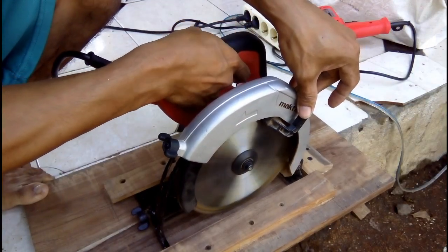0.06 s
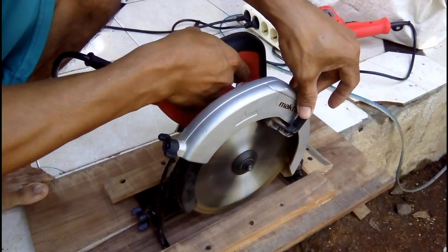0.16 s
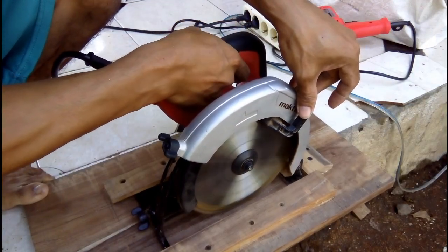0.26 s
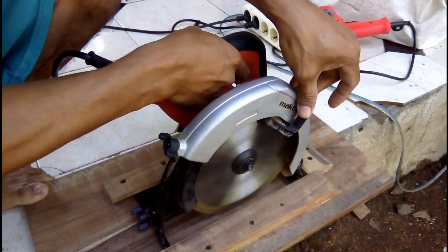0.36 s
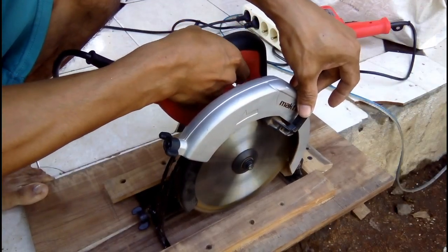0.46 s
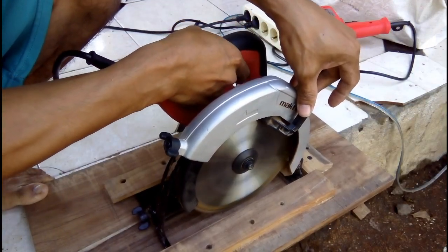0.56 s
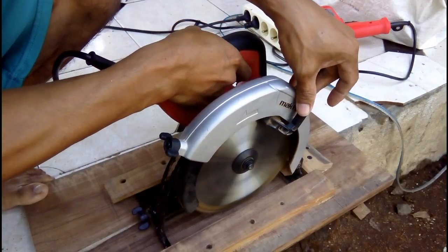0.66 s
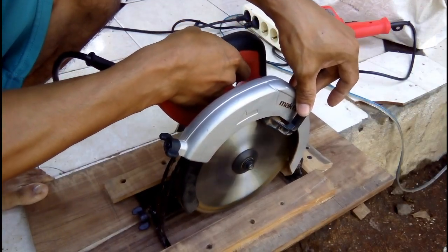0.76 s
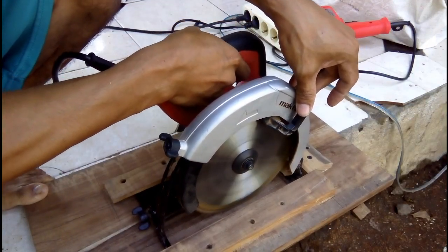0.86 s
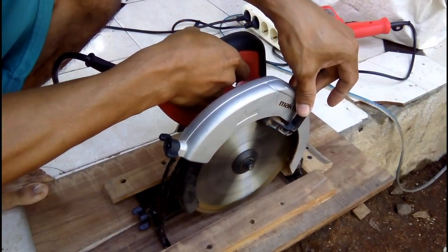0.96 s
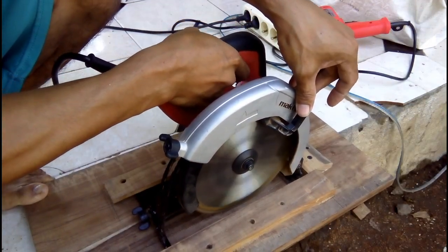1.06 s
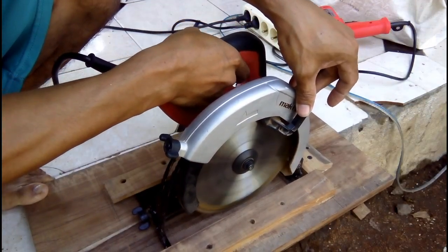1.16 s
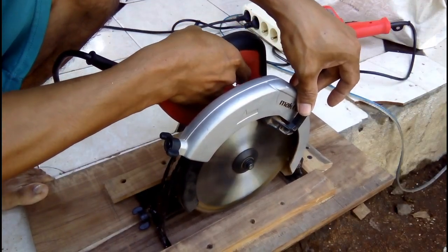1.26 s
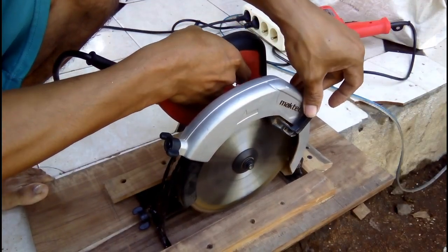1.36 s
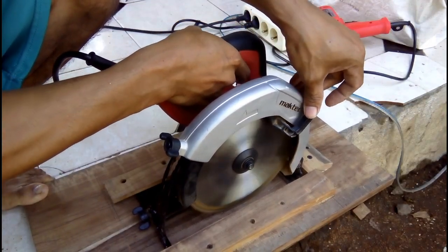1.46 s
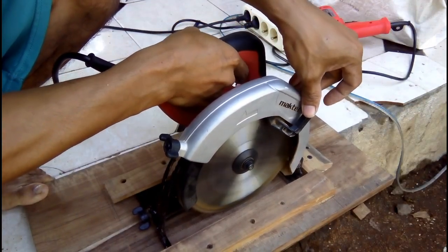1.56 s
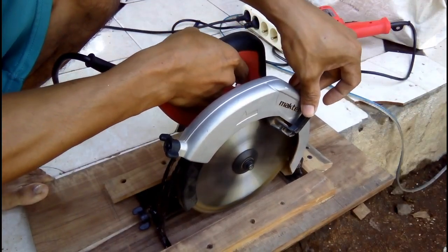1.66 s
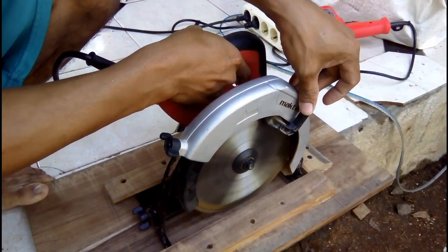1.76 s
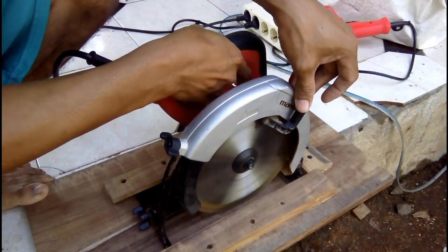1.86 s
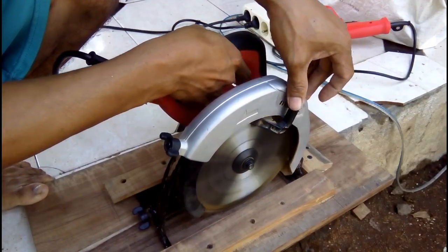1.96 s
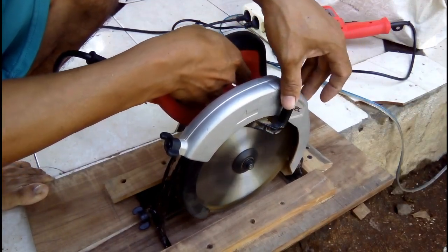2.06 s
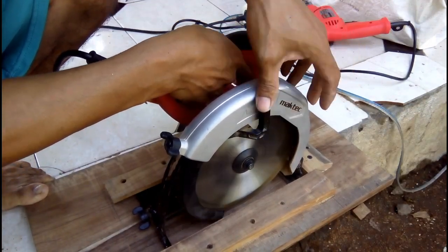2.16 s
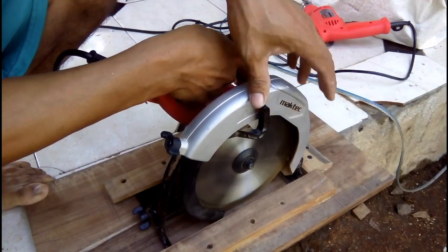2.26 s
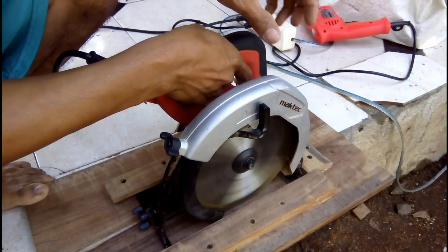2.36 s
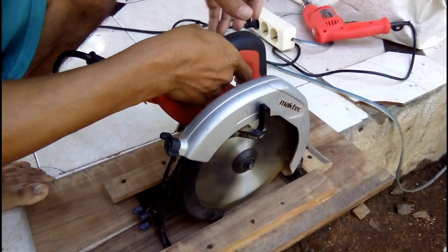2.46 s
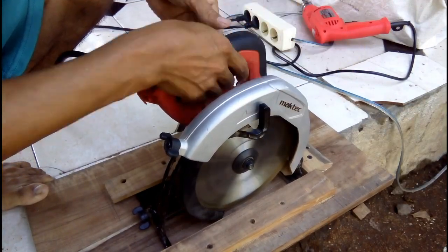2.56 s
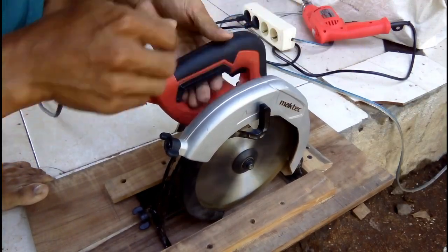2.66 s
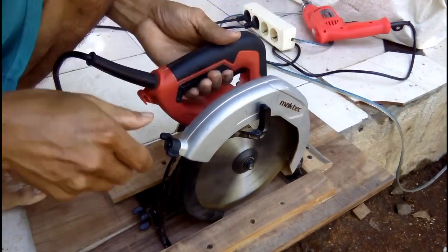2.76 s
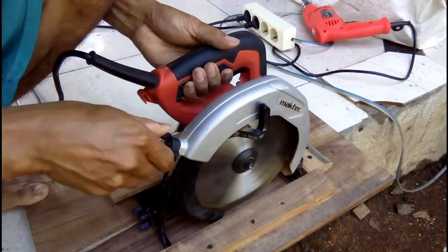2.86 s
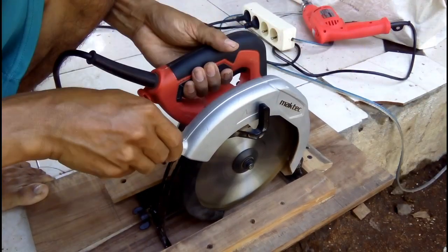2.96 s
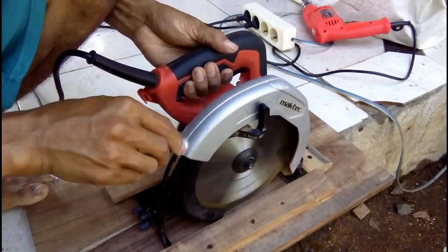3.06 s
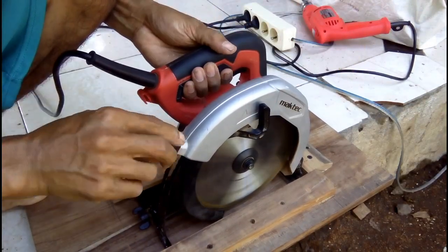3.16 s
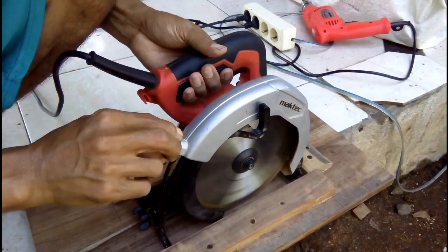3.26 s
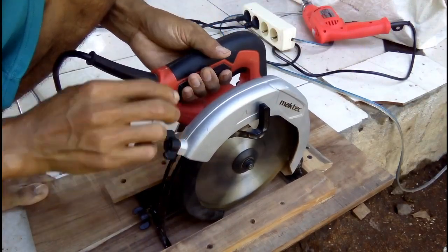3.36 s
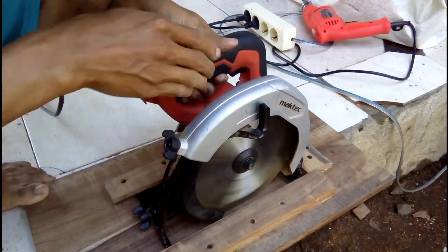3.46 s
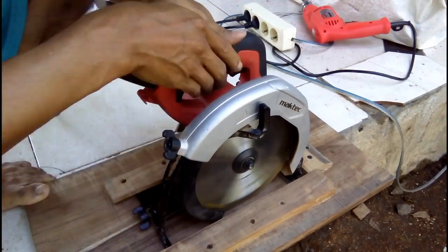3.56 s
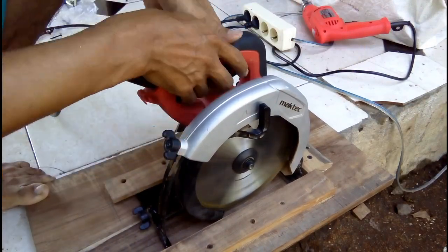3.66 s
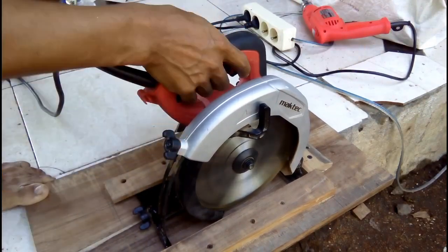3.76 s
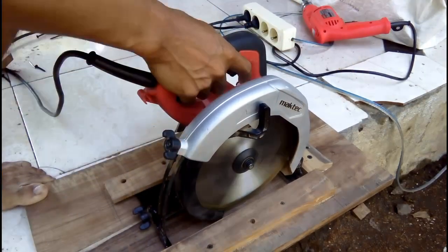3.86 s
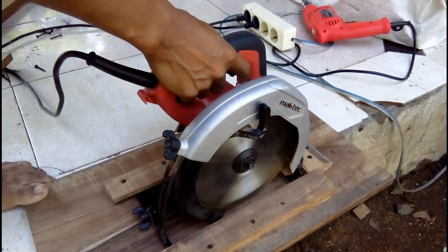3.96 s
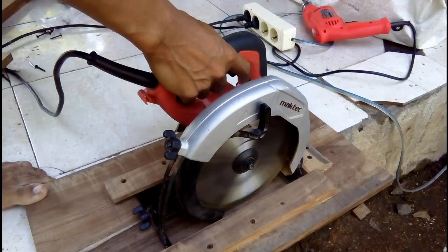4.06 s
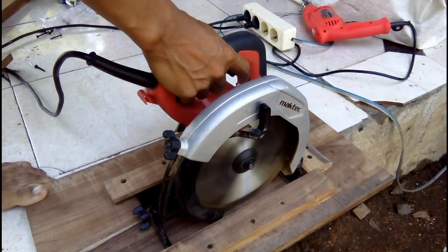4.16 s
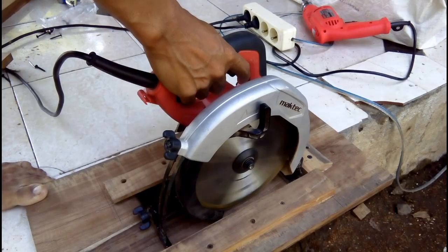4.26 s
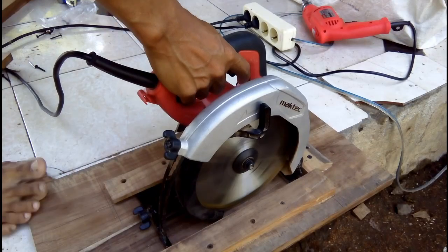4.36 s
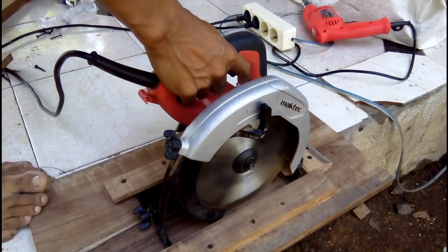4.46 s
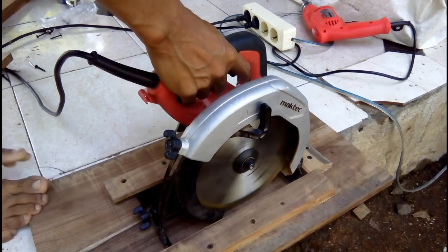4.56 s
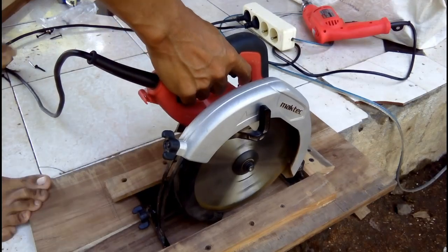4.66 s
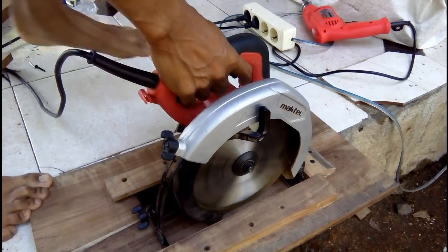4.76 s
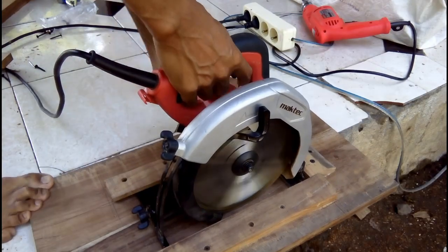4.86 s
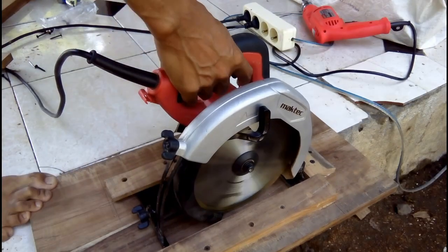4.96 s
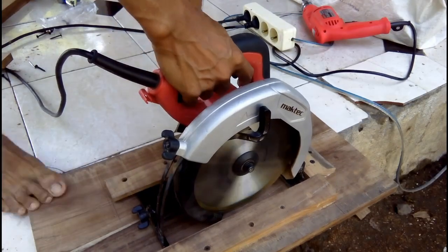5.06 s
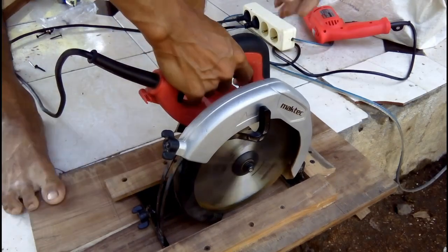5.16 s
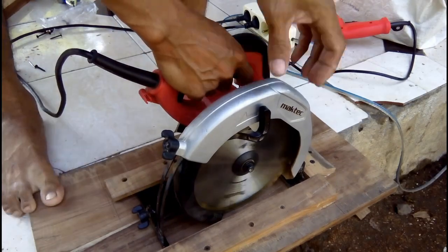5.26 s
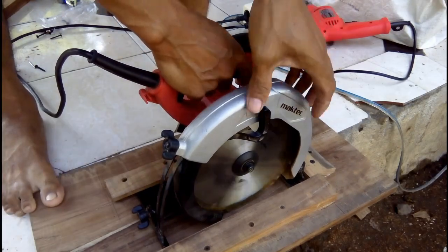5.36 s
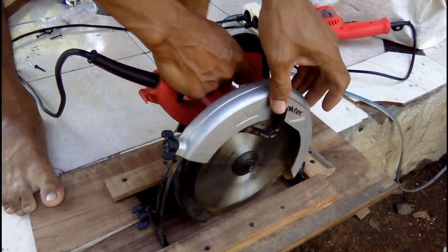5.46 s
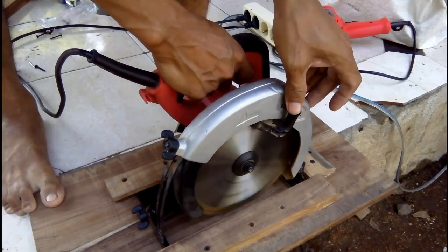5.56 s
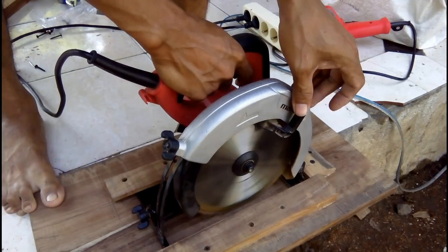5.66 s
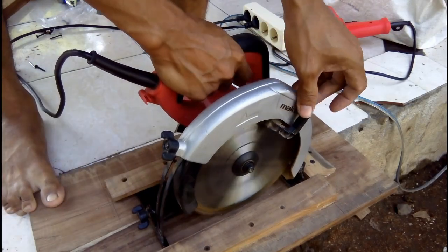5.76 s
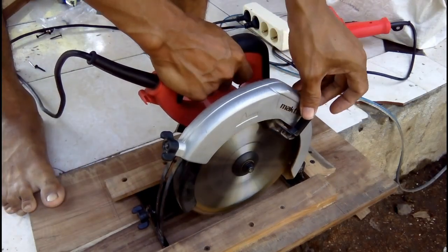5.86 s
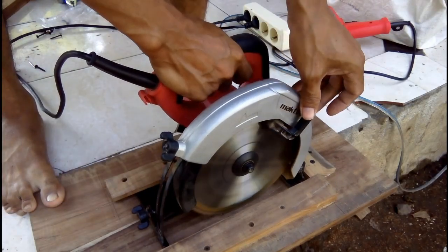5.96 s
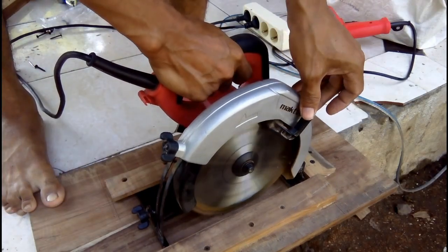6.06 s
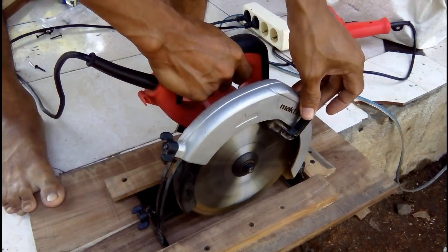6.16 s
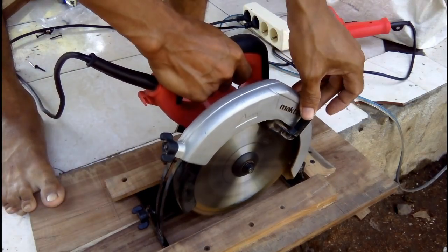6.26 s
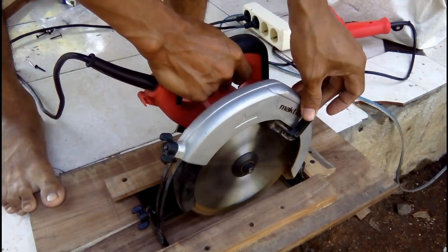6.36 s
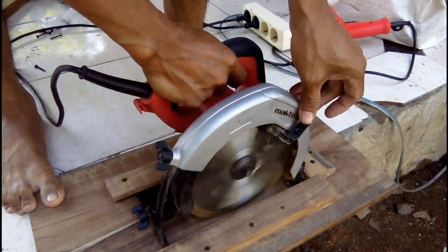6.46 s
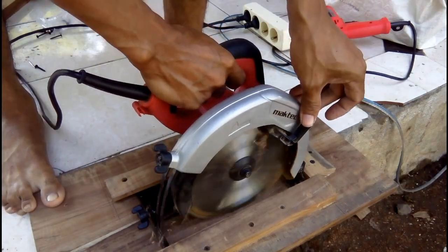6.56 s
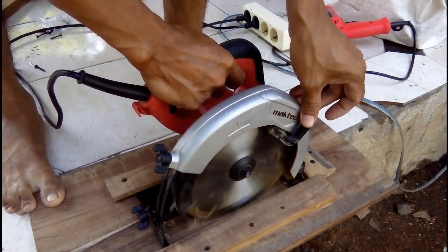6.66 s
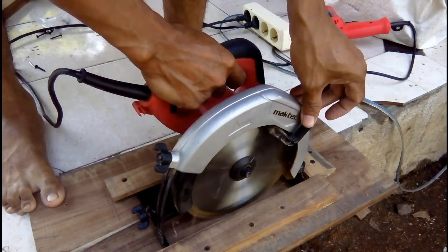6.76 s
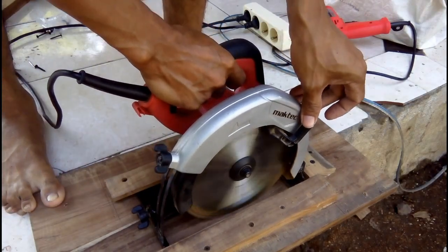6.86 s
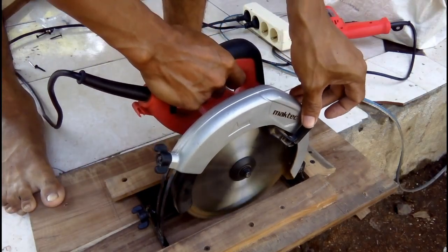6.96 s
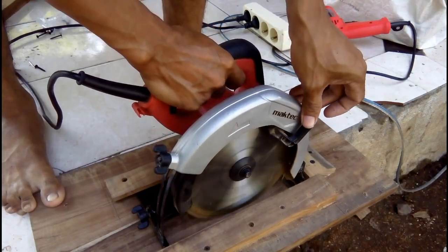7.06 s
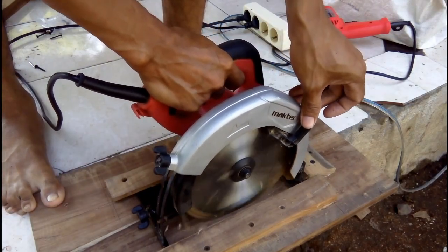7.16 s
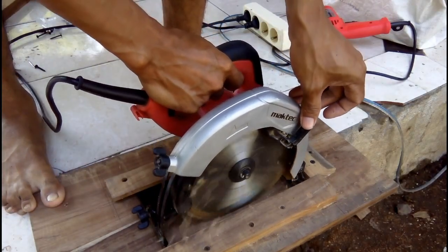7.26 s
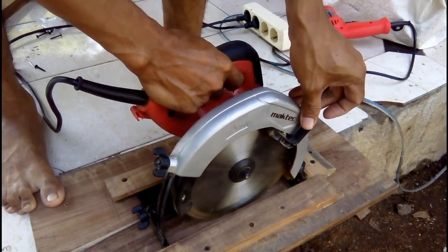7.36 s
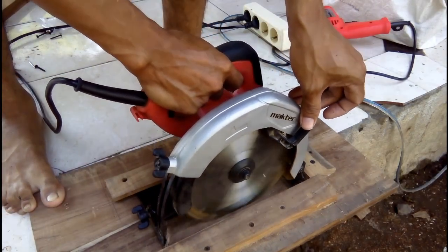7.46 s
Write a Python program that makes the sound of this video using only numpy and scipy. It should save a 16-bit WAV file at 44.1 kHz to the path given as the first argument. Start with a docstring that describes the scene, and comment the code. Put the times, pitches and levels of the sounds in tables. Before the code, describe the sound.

A circular saw on a wooden board, heard very close in stereo, treble leaning left, with a faint steady background. From 0 to 1.5 s it runs free: broad airy blade rush, gritty gear and brush whine, a low once-per-turn hum and faint whistles, with a small dip in speed near 0.9 s and recovery. From about 1.5 s it is off and coasts; the whine glides down and the rush thins, howling briefly around 2.4 s with a light knock. From 3.4 s the board booms and the saw joggles, with dense soft thumps and slaps strongest near 4.3 s, then sparser and weaker, almost still by 5.7 s. At 5.7-5.85 s a cluster of clacks and a sudden growling blip, a slight drop, another clack at 6.05 s, then a rapid run-up. From 6.6 s to the end at 7.5 s it holds a loud, harsh high whine with hard metallic gear chatter and whistles.

```python
"""On a wooden board, close to two microphones, a circular saw runs free and is let go briefly.
It is then switched off and coasts almost to rest, and is at last blipped and run up again.
Fan and blade rush as shaped noise; gear and commutator lines glide through the casing resonances.
Brushes rub, gear teeth strike the gearbox and guard, and blade whistles and guard rings swell as sines.
The slowing saw joggles on the board: impulses ring the wood, with short noisy slaps on top."""
import sys
import numpy as np
from scipy import signal
from scipy.fft import rfft, irfft, next_fast_len
from scipy.io import wavfile
from scipy.ndimage import uniform_filter1d, map_coordinates

SR = 44100
rng = np.random.default_rng(int(sys.argv[2]) if len(sys.argv) > 2 else 0)


def to_wav(sig):
    """Store sig (one row per channel, or 1-D mono) as 16-bit WAV at the path in sys.argv[1].

    Samples outside -1..1 are clipped; the rate is SR.
    """
    pcm = np.clip(np.atleast_2d(sig), -1, 1) * 32767
    pcm = np.round(pcm).astype(np.int16)
    wavfile.write(sys.argv[1], SR, pcm.T)  # frames by channels


N = 331632
# for pure tones: the share that reaches the microphones directly, and the share that is scattered
MOSTLY_DIRECT = np.array([[1], [.3]])


def amp(db):
    """Decibels to gain."""
    return 10 ** (np.asarray(db) / 20)


def unit(x):
    """Scaled to rms 1."""
    return x / np.sqrt(np.mean(x ** 2) + 1e-20)


def seconds():
    """Time of every sample in s."""
    return np.arange(N) / SR


def along(points, hz):
    """(Hz, value) points read on a log axis."""
    f, v = np.transpose(points)
    return np.interp(np.log(hz + 1), np.log(f + 1), v)


def curves(rows):
    """One value per sample for each column after the time."""
    s, *cols = np.transpose(rows)
    return [np.interp(seconds(), s, c) for c in cols]


def wobble(rate):
    """A smooth random curve, rate knots a second."""
    knots = rng.standard_normal(int(N * rate / SR) + 4)
    return map_coordinates(knots, [np.arange(N) * rate / SR], order=2)


def filtered(x, response):
    """x times a complex response of frequency."""
    m = next_fast_len(N + SR // 2)
    return irfft(rfft(x, m) * response(np.fft.rfftfreq(m, 1 / SR)), m)[..., :N]


def lowpass(x, corner_hz, power):
    """x with its treble falling away above a corner, without delay."""
    return filtered(x, lambda hz: 1 / (1 + (hz / corner_hz) ** power))


def ring(x, modes, leak=0):
    """x through resonances, plus a share that passes straight on."""
    def response(f):
        bands = (amp(db) * 1j * f * w / (c * c - f * f + 1j * f * w) for c, w, db in modes)
        return leak + sum(bands)
    return filtered(x, response)


def noise(spectrum):
    """Two unrelated noises, jointly of rms 1: the direct sound and the scattered sound."""
    return unit(filtered(rng.standard_normal((2, N)), lambda hz: amp(along(spectrum, hz))))


def trailing(x, window_s):
    """Running mean over the time just past."""
    size = max(int(window_s * SR), 4)
    return np.abs(uniform_filter1d(x, size, origin=size // 2 - 1))


def impulses(rate):
    """A one at each whole cycle of a rate in Hz, zeros between."""
    return np.diff(np.floor(np.cumsum(rate) / SR), prepend=0)


def shaft_angle(speed):
    """Angle of the armature in radians."""
    return 2 * np.pi * np.cumsum(speed) / SR


def restarted(speed):
    """True from just after the slowest moment on, when the trigger is pulled again."""
    return np.arange(N) > np.argmin(speed)


def torque(speed, smooth_s=0.022):
    """Load on the motor, 0-1: it works hard only while it gathers speed."""
    pickup = trailing(np.maximum(np.diff(speed, prepend=speed[0]), 0), smooth_s)
    return pickup / pickup.max()


# armature speeds in turns/s; below the crawl rubbing dies away
FULL_SPEED, CRAWL_SPEED = 436, 31


def strength(speed, law, load_power=0.86):
    """Gain of one part: windage, rubbing and load add in power."""
    wind_db, wind_power, rub_db, rub_power, load_db = law
    share = speed / FULL_SPEED
    wind = amp(wind_db) * share ** wind_power
    rub = amp(rub_db) * share ** rub_power * np.tanh(speed / CRAWL_SPEED)
    load = amp(load_db) * torque(speed) ** load_power
    return np.sqrt(wind ** 2 + rub ** 2 + load ** 2)


def resonant(speed, swell, still_speed=60):
    """Gain that peaks as the armature passes one speed and dies as it comes to rest."""
    centre, octaves, peak_db, base_db = swell
    peak = amp(peak_db) / (1 + (np.log2(speed / centre) / octaves) ** 2)
    return np.hypot(peak, amp(base_db)) * np.sqrt(np.tanh(speed / still_speed))


# quiet background spectrum: [f/Hz, relative level/dB per Hz]
BACKGROUND = [(60, -5), (300, 0), (1000, -7), (4000, -20), (9000, -44), (15000, -54)]


def background(level_db=-48):
    """Steady faint noise behind the saw."""
    return amp(level_db) * noise(BACKGROUND)


# air spectra from low to high: [f/Hz, relative level/dB per Hz]
ROAR = [(130, -50), (220, -16.5), (290, -7.5), (400, -1.5), (540, -6.5), (740, 1.5), (1000, -7.5),
        (1170, -16), (1300, -7), (1690, -40), (2860, -120)]
RUSH = [(710, -53), (1200, -11.5), (1430, -3), (1690, 0), (1860, -4), (2110, 2.5), (2530, -2.5),
        (3400, -10.5), (4420, -38), (7480, -120)]
JET = [(1880, -18), (3200, 2.5), (3440, -2), (3840, 0.5), (4150, -2), (4670, -1.5), (4900, -3), (6030, -2),
       (6870, -9), (7400, -6.5), (8200, -65), (10700, -50), (18000, -120)]
HISS = [(4470, -26), (7600, 3), (8050, -0.5), (9790, -4), (13600, -8.5), (14600, -6.5), (15200, -34)]
# hollow colour of the vents, strong in the first run: [f/Hz, width/Hz, relative level/dB]
VENTS = [(2100, 360, 3.5), (3177, 32, 0.5), (3285, 31, 1.5), (3577, 48, 7.5), (3740, 160, 7.5),
         (4960, 120, 3)]
# growth with speed and load, for each air band: [windage level/dB at full speed, its power of speed,
# rubbing level/dB at full speed, its power of speed, load level/dB at full torque]
ROAR_LAW = (-25.5, 2.5, -36.5, 0.63, -31.5)
RUSH_LAW = (-17.5, 2, -39, 0.3, -27)
JET_LAW = (-15.5, 3.5, -37.5, 0.9, -29)
HISS_LAW = (-29.5, 4, -50, 0.85, -46.5)


def air(speed, spell_hiss, vents_db=-3.0, restart_rush_db=1):
    """Turbulence round blade and fan; the upper part flutters and pulses with the mains."""
    laws = (ROAR_LAW, RUSH_LAW, JET_LAW, HISS_LAW)
    roar, rush, jet, hiss = (strength(speed, law) for law in laws)
    mains_pulse = 1 + 0.076 * np.sin(2 * np.pi * 100 * seconds())
    flutter = amp(0.72 * wobble(180) + 0.65 * wobble(25)) * mains_pulse
    hollow_db = curves([(1.6, 0), (2.8, -15)])[0] + vents_db
    vent_noise = ring(rng.standard_normal((2, N)), VENTS)
    vents = jet * amp(hollow_db) * unit(filtered(vent_noise, lambda hz: hz < 7400))
    upper = rush * amp(restart_rush_db * restarted(speed)) * noise(RUSH)
    upper = upper + jet * noise(JET) + np.hypot(hiss, spell_hiss) * noise(HISS)
    return roar * noise(ROAR) + flutter * (upper + vents)


# casing resonances: [f/Hz, width/Hz, relative level/dB]
CASING = [(700, 73, -1.5), (990, 52, -11), (1185, 78, 1.5), (1810, 235, 3), (2080, 81, -27), (3190, 70, -4),
          (3317, 90, 3.5), (4360, 170, -13), (5390, 110, -4.5), (6240, 570, -2.5)]
# brush growth: [windage level/dB, its power of speed, rubbing level/dB, its power, load level/dB]
BRUSH_LAW = (-51, 10, -32, 0.55, -46)


def brushes(speed):
    """Carbon brushes and bearings rub steadily and keep the casing ringing."""
    rubbing = lowpass(rng.standard_normal((2, N)), 6800, 12)
    return strength(speed, BRUSH_LAW) * unit(ring(rubbing, CASING, leak=.02))


PINION_TEETH = 7
# gearbox running loose, gearbox in the ringing spells, blade guard: [f/Hz, width/Hz, relative level/dB]
LOOSE = [(1943, 110, -1.5), (3320, 68, 1), (4230, 170, -13), (5250, 48, -6.5), (6265, 130, -4),
         (7000, 22, -21)]
GEARBOX = [(1820, 94, -12), (2870, 80, -9), (3280, 117, 4.5), (4420, 160, -9.5), (5780, 50, -2),
           (6280, 160, -10), (6500, 120, -4.5), (7250, 62, -8)]
GUARD = [(722, 10, -2), (1183, 42, 5), (1270, 82, 0)]
# rattle growth: [windage level/dB, its power of speed, rubbing level/dB, its power, load level/dB]
GEARBOX_LAW = (-43, 25, -28, 0.82, -51)
GUARD_LAW = (-29, 5, -33, 0.77, -24)


def rattle(speed, spell_box, spell_guard):
    """Pinion teeth strike with uneven force and ring the gearbox and the blade guard."""
    force = rng.standard_normal((2, N)) * amp(2.5 * wobble(400)) / np.sqrt(speed)
    # greased contacts are soft: little is left above the highest mode
    blows = lowpass(impulses(speed * PINION_TEETH) * force, 7800, 12)
    # the ringing spells wake other modes of the gearbox
    loose = strength(speed, GEARBOX_LAW) * unit(ring(blows, LOOSE))
    box = loose + spell_box * unit(ring(blows, GEARBOX))
    # the housing dulls the blows on their way to the guard
    dulled = lowpass(blows, 2200, 2)
    guard_gain = np.hypot(strength(speed, GUARD_LAW), spell_guard)
    return box + guard_gain * unit(ring(dulled, GUARD))


def backlash(speed):
    """Play in the gears: a random curve that runs with the turns, so it slows with the saw."""
    turns = np.cumsum(speed) / SR
    return map_coordinates(rng.standard_normal(int(turns[-1]) + 4), [.55 * turns], order=2)


def turn_pattern(angle, count=64, size=4096, blur=.016):
    """Uneven bars and worn teeth repeat the same bumps every turn: a comb of weak lines."""
    orders = rng.standard_normal(count) + 1j * rng.standard_normal(count)
    pattern = unit(irfft(orders * (np.arange(count) > 4), size))
    turn = (angle + blur * wobble(60)) / (2 * np.pi) % 1
    return np.interp(turn, np.arange(size) / size, pattern)


# lines of pinion, commutator and bearings: [cycles per turn, relative level/dB, phase blur/rad]
WHINE_LINES = [(7, 0, 1.2), (14, -1, 1.05), (20, -6, .9), (21, 1, .9), (24, -8, .7), (28, -2, .9),
               (32.5, -7, 1), (39.5, 0, 1.3), (47, -4, 1.4)]


def whine(speed, whine_db=-26.5, loaded_db=-10, speed_power=0.77, fade_speed=370):
    """Rough gear, commutator and bearing lines swell each time they glide through a casing resonance."""
    angle = shaft_angle(speed)
    # backlash shakes every line, so the lines are broad when fast and sharpen as the saw slows
    lines = np.zeros(N, complex)
    for order, db, blur in WHINE_LINES:
        phase = order * angle + blur * backlash(speed)
        lines += amp(db + 3 * backlash(speed)) * np.exp(1j * phase)
    comb = 1.15 * amp(2 * backlash(speed)) * np.array([turn_pattern(angle), turn_pattern(angle)])
    scattered = (lines * np.exp(2j * wobble(20))).imag
    pair = lowpass(comb + np.array([lines.real, scattered]), 6600, 10)
    casing = unit(ring(pair, CASING, leak=.1))
    # the lines grow with speed, sink into the rush near the top and fade
    # while load presses the teeth together
    level = amp(whine_db + loaded_db * torque(speed)) * (speed / FULL_SPEED) ** speed_power
    return level / (1 + (speed / fade_speed) ** 8) * casing


# clean tones near full speed: [cycles per turn, relative level/dB in the first run, in the second]
TOP_TONES = [(3, -49, -24), (4.06, -56, -26), (13, -58, -22.5)]


def top_tones(speed, tones_db=2.0):
    """Low shaft orders and a fan tone stand out only near full speed."""
    angle, second_run = shaft_angle(speed), restarted(speed)
    tones = np.zeros(N)
    for order, early_db, late_db in TOP_TONES:
        level_db = np.where(second_run, late_db, early_db) + 5.5 * wobble(11)
        tones += amp(level_db) * np.sin(order * angle + 0.77 * wobble(50))
    near_top = (speed / FULL_SPEED) ** np.where(second_run, 24, 2.2)
    return amp(tones_db) * tones * near_top * MOSTLY_DIRECT


# mains buzz while the starting current surges: [f/Hz, relative level/dB]
SURGE = [(100, -36), (200, -27), (300, -28), (400, -64)]


def surge(speed, rough=0.7, torque_power=2.4, surge_db=1):
    """The motor draws a heavy current as it gathers speed and growls at mains harmonics."""
    growl = np.zeros(N)
    for hz, db in SURGE:
        growl += amp(db + surge_db) * np.sin(2 * np.pi * hz * seconds() + rough * wobble(60))
    return torque(speed) ** torque_power * growl


# swells of the once-a-turn hum: [middle t/s, length/s, level/dB]
HUM_SWELLS = [(0.087, 0.71, -29.5), (0.517, 0.35, -24), (1.252, .4, -31), (1.6, .3, -36), (1.995, 0.4, -35),
              (2.224, .2, -36)]


def hum(speed):
    """The armature hums once a turn, swelling and fading in arches."""
    level = np.zeros(N)
    for s, length, db in HUM_SWELLS:
        level += amp(db) * np.cos(np.pi * np.clip((seconds() - s) / length, -.5, .5))
    return level * np.sin(shaft_angle(speed) + 0.4 * wobble(50)) * MOSTLY_DIRECT


# spectra of the board's drone and of its deep rumble: [f/Hz, relative level/dB per Hz]
BOARD = [(15, -51), (25, -31), (38, -27), (54, -21), (104, 5), (139, -1), (171, -11), (215, -17),
         (280, -3.5), (360, -8), (620, -120)]
RUMBLE = [(15, -8), (30, -1), (60, 0), (100, -5), (160, -28), (300, -80)]
# speeds that shake the board most: [turns/s, width/octaves, level/dB there, level/dB far from it]
DRONE_SWELL = (155, 1, -37.5, -42)
RUMBLE_SWELL = (105, .55, -45, -72)


def drone(speed, unbalance_db=-32):
    """The unbalanced armature makes the board drone, rumble, and boom as it slows through 157 turns/s."""
    unbalance = np.sin(shaft_angle(speed) + .5 * wobble(30))
    mode = [(157.0, 8, 0)]  # f/Hz, width/Hz, level/dB
    boom = amp(unbalance_db) * ring(ring(unbalance, mode), mode)
    shaking = resonant(speed, DRONE_SWELL) * noise(BOARD)
    return shaking + resonant(speed, RUMBLE_SWELL) * noise(RUMBLE) + boom


def slow_share(speed, changeover_speed=120):
    """Rises from 0 to 1 as the saw slows past the changeover in turns/s: quick bumps give way to slow."""
    return 1 / (1 + (speed / changeover_speed) ** 20)


# the board under quick bumps and under slow ones: [f/Hz, width/Hz, relative level/dB]
BOARD_HUM = [(155, 64, 0), (310, 110, -12), (520, 160, -9)]
BOARD_THUD = [(79.5, 37, -7), (123, 59, 5), (280.4, 20, 2)]


def humming(x):
    """Quick bumps swell into short, rounded hums: the board's modes twice over."""
    return ring(ring(x, BOARD_HUM), BOARD_HUM)


def thudding(x):
    """Slow bumps land as separate, deeper thuds."""
    return lowpass(ring(x, BOARD_THUD), 340, 4)


# the hardest landings of the sole plate: [t/s, relative peak level/dB]
THUMPS = [(3.841, -24), (3.868, -20.5), (3.923, -23), (3.948, -22), (3.975, -20), (3.998, -20),
          (4.032, -22), (4.061, -19), (4.085, -22), (4.112, -18), (4.141, -17), (4.169, -16.5),
          (4.189, -16.5), (4.223, -15.5), (4.245, -15), (4.271, -12.5), (4.291, -15), (4.329, -14.5),
          (4.383, -14), (4.413, -15), (4.444, -19), (4.475, -16), (4.512, -22), (4.541, -18.5),
          (4.57, -17.5), (4.607, -20), (4.646, -24), (4.689, -22.5), (4.721, -17.5), (4.764, -18.5),
          (4.798, -20), (4.819, -22), (4.889, -23), (4.919, -26), (4.945, -22), (5.21, -25.5), (5.249, -28),
          (5.288, -23.5), (5.437, -27), (5.476, -28), (5.509, -25), (5.635, -27), (5.67, -23.5)]


def hard_landings():
    """One impulse for each of the hardest landings."""
    s, db = np.transpose(THUMPS)
    return np.bincount((s * SR).astype(int), amp(db), N)


# speed that joggles the saw most: [turns/s, width/octaves, level/dB there, level/dB far from it]
JOGGLE_SWELL = (126, 0.72, -31.5, -44)


def joggling(speed, quick_hz=34.02, slow_hz=26.95, scrape_t60=0.013, scrape_db=-31, slow_db=-3):
    """Light bumps of the sole plate carry the rhythm on between the hard landings."""
    slow = slow_share(speed)
    rate = (slow * slow_hz + (1 - slow) * quick_hz) * (1 + .08 * wobble(15))
    bumps = impulses(rate) * amp(3.1 * wobble(30))
    # no light bump within about 25 ms of a hard landing
    bumps = bumps * (uniform_filter1d(np.sign(hard_landings()) * SR, size=SR // 20) < 1)
    # the sole plate lands softly, with a little scrape
    t = np.arange(SR // 40) / SR
    scrape = signal.fftconvolve(bumps, amp(-60 * t / scrape_t60))[:N] * rng.standard_normal(N)
    landings = lowpass(bumps + amp(scrape_db) * scrape, 430, 6)
    quick_part = (1 - slow) * unit(humming(landings))
    slow_part = slow * amp(slow_db) * unit(thudding(landings))
    return -resonant(speed, JOGGLE_SWELL) * (quick_part + slow_part)


# blade whistles, short guard rings near 1.2 kHz, and a gear note before the last run-up:
# [middle t/s, length/s, f/Hz, relative level/dB]
SUNG_TONES = [(0.177, 0.12, 1670, -27), (.44, 0.2, 1657, -20), (1.33, .5, 3530, -27),
              (1.204, 0.45, 3285, -29), (.5, .25, 3190, -30), (1.19, 0.36, 1654, -24),
              (1.875, 0.13, 1630, -29), (1.856, 0.15, 1154, -29.5), (4.80, 0.11, 1155, -35),
              (5.105, 0.084, 1193, -35), (5.425, 0.061, 1184, -40), (5.57, .09, 1170, -50),
              (6.013, 0.21, 1567, -32.5), (6.503, 0.69, 1746, -22.5), (6.517, .28, 2670, -28),
              (6.55, .4, 3480, -27), (6.627, 0.64, 1640, -24.5), (6.963, 0.34, 1625, -21.5),
              (7.217, 0.13, 1636, -16.5)]
# partials that sound along with each tone: [frequency ratio, level/dB relative to the tone]
SUNG_PARTIALS = [(1, 0), (1.996, -18), (2.838, -18)]


def sung_tones(tones_db=4.0):
    """Blade whistles, guard rings as gear lines pass, and a gear note: sines in short arched swells."""
    t = seconds()
    drift = 0.55 * wobble(50)
    tones = np.zeros(N)
    for s, length, hz, db in SUNG_TONES:
        on = np.abs(t - s) < length / 2
        phase = 2 * np.pi * hz * (t[on] - s) + drift[on]
        swell = amp(db + tones_db) * np.cos(np.pi * (t[on] - s) / length)
        tones[on] += swell * sum(amp(level) * np.sin(k * phase) for k, level in SUNG_PARTIALS)
    return tones * MOSTLY_DIRECT


# spells of gear ringing: faint swells near 3.3 kHz in the coast, hard chatter near full speed:
# [start t/s, length/s, gearbox level/dB, guard level/dB, hiss level/dB]
RINGING_SPELLS = [(1.035, 0.34, -31, -33, -33), (1.797, .11, -29, -26.5, -33.5),
                  (2.777, 0.44, -40.5, -48, -65), (3.8, .16, -44, -45, -70), (5.883, 0.12, -34, -32, -57),
                  (6.052, 0.051, -28, -25, -42), (6.2, 0.59, -26.5, -20, -36),
                  (6.654, 0.99, -11, -16.5, -21), (6.727, .15, -32, -13.5, -23),
                  (7.184, 0.12, -28, -14, -22.5), (7.333, 0.14, -15, -18, -28), (7.45, .1, -22, -12.5, -26)]


def ringing_spells(rise_s=0.031):
    """Gains of gearbox, guard and hiss: each spell of gear ringing rises, holds and falls."""
    t = seconds()
    power = np.zeros((3, N))
    for s, length, *db in RINGING_SPELLS:
        spell = np.clip(np.minimum(t - s, s + length - t) / rise_s + .5, 0, 1)
        power += np.outer(amp(db), spell) ** 2
    return np.sqrt(power)


# hand, trigger and gear knocks: [t/s, relative clack level/dB, ring level/dB, relative thud level/dB]
KNOCKS = [(2.387, -25, -34, -21), (4.067, 1, -30, -33), (5.712, -20, -24, -26), (5.727, -9, -7, -21),
          (5.737, -14, -16, -23), (5.761, -10, -12, -30), (5.779, -8, -9, -30), (5.794, -2, -13, -26),
          (5.806, 0, -11, -30), (5.82, -7, -14, -21), (5.826, -4, -15, -36), (5.848, 2, -20, -35),
          (5.887, -6, -30, -45), (6.046, 1, -10.5, -30), (6.068, -5, -22, -27), (6.09, -6, -24, -36),
          (6.159, -7, -24, -38)]
# modes that only a hard knock wakes: [f/Hz, relative level/dB, t60/s]
CLACK = [(1033, -9, 0.037), (1144, -2.5, 0.1), (1627, -9, 0.066), (3330, -9.5, 0.061), (4480, -9, 0.046),
         (4870, -29, 0.031)]
# the board under a knock: [f/Hz, width/Hz, relative level/dB]
THUD = [(170, 70, -2), (320, 140, 0), (490, 220, 1.5), (780, 260, 7)]


def knocks(clack_db=-4, thud_db=14, clack_t60=0.031, thud_t60=0.038):
    """Each knock is a short chatter of contacts into the casing, a clean metal ring and a thud in the board."""
    t = np.arange(SR // 5) / SR
    clack, clang, thud = np.zeros((3, 2, N))
    for s, contact_db, clang_db, low_db in KNOCKS:
        span = slice(round(s * SR), round(s * SR) + len(t))
        contact = amp(contact_db + clack_db - 60 * t / clack_t60)
        clack[:, span] += contact * rng.standard_normal((2, len(t)))
        for hz, level, t60 in CLACK:
            decay = amp(clang_db + level + rng.normal(0, 1) - 60 * t / t60)
            clang[0, span] += decay * np.sin(2 * np.pi * hz * t + rng.uniform(0, np.pi))
        low = amp(low_db + thud_db - 60 * t / thud_t60)
        thud[:, span] += low * rng.standard_normal((2, len(t)))
    metal = ring(clack, CASING, leak=0.057) + clang
    return lowpass(metal, 6800, 8) + lowpass(ring(thud, THUD), 1100, 4)


COMMUTATOR_BARS = 24
# speeds that whistle and howl: [turns/s, width/octaves, level/dB there, level/dB far from it]
WHISTLE_SWELL = (238, 0.24, -36, -71)
HOWL_SWELL = (264, .09, -27, -70)


def whistle_and_howl(speed):
    """Before the restart, commutator whistles and pinion howls, each near one speed of the coast."""
    angle = shaft_angle(speed)
    whistle = np.sin(COMMUTATOR_BARS * angle + 0.77 * wobble(50))
    whistle = whistle * resonant(speed, WHISTLE_SWELL) * amp(5.5 * wobble(30.06))
    # the pinion howls near 1.85 kHz, close to a casing resonance
    howl = np.sin(PINION_TEETH * angle + 1.1 * backlash(speed))
    howl = howl * resonant(speed, HOWL_SWELL) * amp(3 * backlash(speed))
    return ~restarted(speed) * (whistle + howl) * MOSTLY_DIRECT


def thumps(speed):
    """The hardest landings of the sole plate ring the board, humming when quick and thudding when slow."""
    slow, hard = slow_share(speed), hard_landings()
    soft = lowpass(hard, 430, 6)
    hums, thuds = humming(soft), thudding(soft)
    mixed = (1 - slow) * hums / np.abs(hums).max() + slow * thuds / np.abs(thuds).max()
    return -hard.max() * mixed


# the sole plate on the wood: [f/Hz, relative level/dB per Hz]
SLAP = [(120, -35), (250, -0.5), (400, -1), (560, -3.5), (750, -16), (1300, -44), (3000, -90)]


def slaps(slap_db=-13.0, slap_t60=0.052, scatter_db=2.5, rise_s=0.0028):
    """Every hard landing adds a short, rough slap of steel on wood."""
    t = np.arange(SR // 10) / SR
    level = np.zeros(N)
    for (s, db), chance in zip(THUMPS, rng.standard_normal(len(THUMPS))):
        decay = amp(db + slap_db + scatter_db * chance - 60 * t / slap_t60)
        level[round(s * SR):][:len(t)] += decay * np.minimum(t / rise_s, 1)
    return level * noise(SLAP)


def softened(x, speed, gentle_speed=48, top_hz=5000):
    """Contacts lose their highest treble as the saw coasts to a crawl."""
    gentle = ~restarted(speed) / (1 + (speed / gentle_speed) ** 4)
    return x - gentle * (x - lowpass(x, top_hz, 8))


# the two microphones: likeness [f/Hz, likeness 0-1, where below 0 counts as 0]
ALIKE = [(30, .87), (120, .96), (300, .96), (600, .92), (1200, 0.62), (2500, 0.64), (5000, 0.52),
         (14000, -0.3)]
# and balance [f/Hz, left minus right level/dB]
LEFT = [(60, 2.4), (140, 2.3), (210, 1.5), (330, 4.5), (500, 4.9), (760, 4.2), (1160, 5.7), (1780, 8.5),
        (2710, 7.8), (4150, 7.9), (6330, 0.071), (9670, 1.1), (14800, 17)]


def microphones(pair, lag_s=7e-5):
    """The left microphone is nearer by the lag; in the treble scattered sound makes the two unlike."""
    def gains(hz):
        turn = np.arccos(np.clip(along(ALIKE, hz), 0, 1)) / 2
        near = amp(along(LEFT, hz) / 2) * np.exp(1j * np.pi * hz * lag_s)
        left = [near * np.cos(turn), near * np.sin(turn)]
        right = [np.cos(turn) / near, -np.sin(turn) / near]
        mix = np.array([left, right])
        # the mean of both microphones keeps its spectrum
        return mix / np.linalg.norm(mix.mean(0), axis=0)
    return filtered(pair, gains).sum(1)


# armature speed: [t/s, speed/turns per s]
SPEED = [(0, 402), (.3, 424), (.6, 436), (.92, 396), (1.15, 425), (1.4, 430), (1.95, 345), (2.2, 313),
         (2.6, 270.5), (3, 233), (3.4, 198.5), (5.4, 33), (5.71, 8), (5.86, 246), (6.045, 222), (6.2, 350),
         (6.4, 410), (6.8, 431), (7.52, 437)]


def scene():
    """One armature speed drives the motor, gears and board; tones, spells and knocks come at set times."""
    speed = curves(SPEED)[0]
    box, guard, hiss = ringing_spells()
    contacts = brushes(speed) + rattle(speed, box, guard) + whine(speed)
    contacts = softened(contacts + top_tones(speed) + whistle_and_howl(speed), speed)
    motor = air(speed, hiss) + contacts + surge(speed) + hum(speed)
    wood = drone(speed) + joggling(speed) + thumps(speed) + slaps()
    return microphones(background() + motor + wood + sung_tones() + knocks())


def record(dry, threshold_db=-16, squeeze=0.67, window_s=0.046, top_hz=15300):
    """The recorder turns its gain down on loud sound, clips at full scale and cuts all above its band."""
    power = trailing(dry.mean(0) ** 2, window_s)
    gain = (1 + (power / amp(threshold_db) ** 2) ** 2) ** (-squeeze / 4)
    return filtered(np.clip(dry * gain, -1, 1), lambda hz: hz < top_hz)


dry = scene()
out = record(dry)
to_wav(out)
```